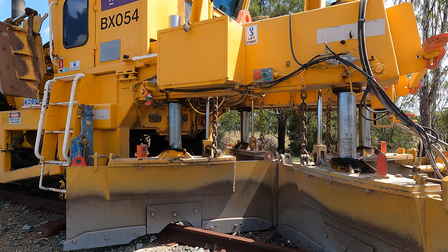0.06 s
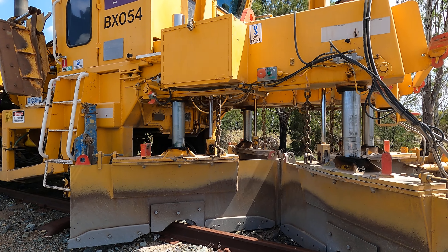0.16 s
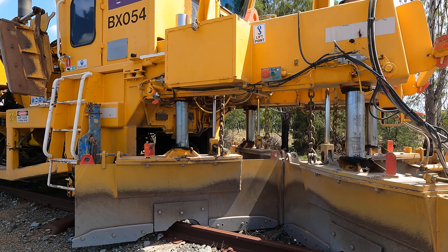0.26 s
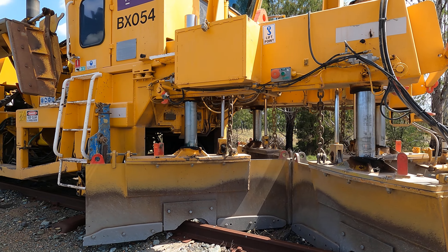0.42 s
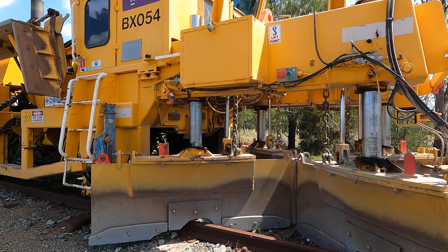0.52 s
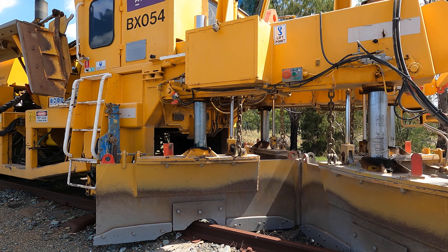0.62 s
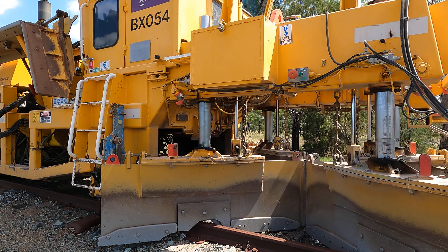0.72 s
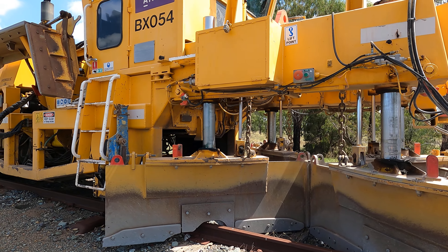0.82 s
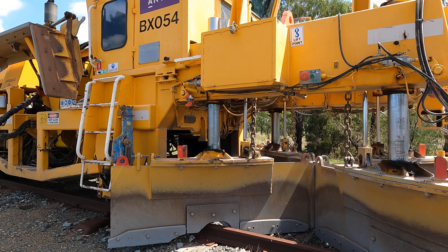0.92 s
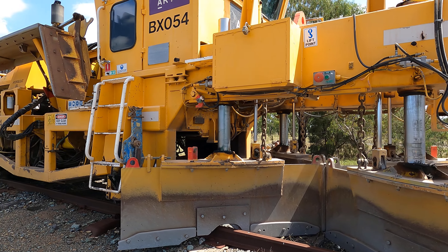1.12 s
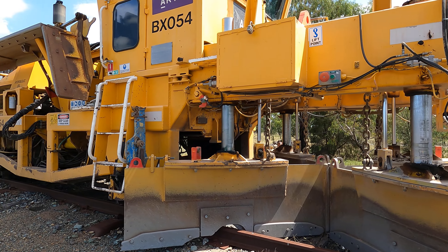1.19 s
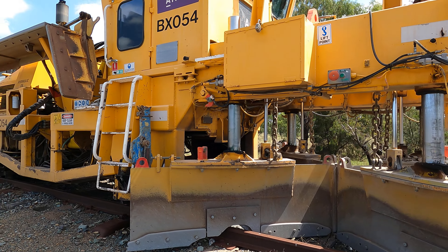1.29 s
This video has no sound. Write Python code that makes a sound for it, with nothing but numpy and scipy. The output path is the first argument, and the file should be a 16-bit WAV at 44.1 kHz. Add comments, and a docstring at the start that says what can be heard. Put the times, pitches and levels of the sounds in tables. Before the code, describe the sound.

A single footstep crunches on gravel, stones snapping together as dull knocks jolt the hand-held microphone. Softer shoe scuffs follow. Light wind nudges the microphone over faint outdoor air, distant insect hiss and thin chirps.

```python
"""Faint outdoor air, thin chirps and insect hiss from the trees, then one step on track gravel, heard from
a hand-held camera. Stones crunch and snap, the ground thuds, and the footfall jolts the camera body with
three quick dull knocks. Softer scuffs of the shoes follow. Air nudges the microphone throughout, and
something in the camera, probably the lens, ticks faintly."""
import sys
import numpy as np
from scipy import signal
from scipy.fft import rfft, irfft, next_fast_len
from scipy.io import wavfile
from scipy.ndimage import map_coordinates

SR = 44100
rng = np.random.default_rng(int(sys.argv[2]) if len(sys.argv) > 2 else 0)


def store_pcm(level_fs):
    """Save levels as 16-bit WAV."""
    pcm = np.round(np.clip(level_fs, -1, 1) * 32767).astype(np.int16)
    wavfile.write(sys.argv[1], SR, np.atleast_2d(pcm).T)


N = 59535
TIME_S = np.arange(N) / SR


def amp(db):
    """Decibels to gain."""
    return 10 ** (np.asarray(db) / 20)


def unit_rms(x):
    """Scale to rms 1."""
    return x / np.sqrt(np.mean(x ** 2) + 1e-20)


def curve_at(points, hz):
    """Interpolate (frequency, value) points on a log axis."""
    knots_hz, values = np.transpose(points)
    return np.interp(np.log(hz + 1), np.log(knots_hz + 1), values)


def tilted(points, db_per_oct, pivot_hz=1500):
    """Tilt a spectrum about the pivot."""
    return [(hz, db + db_per_oct * np.log2(hz / pivot_hz)) for hz, db in points]


def filtered(x, response):
    """Apply response(hz) by FFT."""
    size = next_fast_len(N + SR // 2)
    return irfft(rfft(x, size) * response(np.fft.rfftfreq(size, 1 / SR)), size)[..., :N]


def coloured(x, points):
    """Shape the spectrum; white noise keeps its power."""
    return filtered(x, lambda hz: unit_rms(amp(curve_at(points, hz))))


def pan(db):
    """Constant-power stereo gains; db is left minus right."""
    half_db = np.atleast_1d(db) / 2
    gains = amp([half_db, -half_db])
    return gains / np.sqrt(np.mean(gains ** 2, axis=0))


def stereo_noise(corr):
    """White noise with left-right correlation corr."""
    noise = rng.standard_normal((3, N))
    return np.sqrt(corr) * noise[0] + np.sqrt(1 - corr) * noise[1:]


def coloured_noise(points, corr):
    """Shaped stereo noise, rms 1."""
    return unit_rms(coloured(stereo_noise(corr), points))


def wobble(knots_per_s):
    """Smooth random curve."""
    knots = rng.standard_normal(int(N * knots_per_s / SR) + 4)
    return map_coordinates(knots, [TIME_S * knots_per_s])


def fader(points):
    """Gain along (time, level) points."""
    return amp(np.interp(TIME_S, *np.transpose(points)))


def decay(start_s, t60_s):
    """Step onset, exponential decay."""
    age_s = TIME_S - start_s
    return (age_s >= 0) * amp(-60 * np.maximum(age_s, 0) / t60_s)


def swell(peak_s, db, rise_s, fall_s, pan_db):
    """Stereo envelope, exponential on both sides of the peak."""
    t = TIME_S - peak_s
    return amp(db) * pan(pan_db) * np.exp(-np.maximum(-t / rise_s, t / fall_s))


def burst(start_s, t60_s, corr):
    """Decaying stereo noise with the energy of its envelope."""
    envelope = decay(start_s, t60_s)
    noise = envelope * stereo_noise(corr)
    energy = np.sum(noise ** 2, axis=1, keepdims=True)
    return noise * np.sqrt(np.sum(envelope ** 2) / (energy + 1e-20))


# Background spectrum: (frequency [Hz], gain [dB])
AIR_SPECTRUM = [(20, -4), (45, -12), (85, -39), (130, -9.5), (190, -2), (300, -11), (500, -14.5),
                (800, -22), (1150, -14), (2000, -23.5), (3500, -29.5), (5000, -32), (7200, -34),
                (9800, -44.5), (12500, -31), (15500, -56)]
# Background balance: (frequency [Hz], pan [dB])
AIR_PAN = [(100, -2), (400, -10), (1200, -1.5), (8000, 2), (13000, 11.5)]

def outdoor_air(level_db=-69, waver_db=0.65):
    """Broad outdoor noise; the level wavers slightly."""
    noise = coloured_noise(AIR_SPECTRUM, corr=0.62)
    bed = filtered(noise, lambda hz: pan(curve_at(AIR_PAN, hz)))
    return bed * amp(level_db + waver_db * wobble(knots_per_s=8.4))


# Chorus envelope: (time [s], level [dB])
INSECT_LEVELS = [(0, -72.5), (.2, -70.5), (.45, -73), (.85, -76), (1.05, -77.5), (1.35, -75.5)]
# Chorus spectrum: (frequency [Hz], gain [dB])
INSECT_SPECTRUM = [(3000, -27), (4800, -10.5), (6200, -3.5), (7300, -1), (8300, -11.5), (9500, -19),
                   (12000, -26)]

def insects():
    """Many far insects merge into a narrow, high hiss."""
    return fader(INSECT_LEVELS) * coloured_noise(INSECT_SPECTRUM, corr=0.58)


# Far chirps: (time [s], length [s], start pitch [Hz], end pitch [Hz], level [dB])
CHIRPS = [(.01, .035, 6040, 6850, -71.5), (.315, .02, 7160, 7270, -73.5), (0.343, 0.061, 5950, 5660, -73.5),
          (.372, 0.031, 7500, 7800, -68), (0.422, 0.056, 8030, 7450, -72), (0.733, 0.03, 5850, 5640, -66),
          (.778, 0.027, 8000, 7800, -71.5), (0.821, .018, 5790, 5290, -65), (0.83, 0.022, 7970, 7900, -70),
          (0.842, 0.012, 5830, 5500, -63.5), (0.854, 0.019, 5400, 5440, -63),
          (0.871, 0.022, 5840, 5350, -65.5), (0.833, 0.022, 4820, 5000, -69),
          (0.916, 0.019, 5600, 5970, -63.5), (.955, 0.073, 7150, 6810, -79),
          (1.015, 0.041, 7280, 7700, -69), (1.103, 0.029, 7310, 7340, -69),
          (1.165, 0.03, 7100, 7130, -67.5), (1.271, 0.038, 6900, 7200, -70),
          (1.313, .024, 4570, 4580, -72.5)]

def chirps(rasp_hz=190, echo_gain=0.45):
    """Thin, raspy gliding whistles, smeared by the trees."""
    direct = np.zeros(N)
    for start_s, length_s, start_hz, end_hz, db in CHIRPS:
        progress = np.clip((TIME_S - start_s) / length_s, 0, 1)
        hz = start_hz + (end_hz - start_hz) * progress + rasp_hz * wobble(knots_per_s=1100)
        direct += amp(db) * np.sin(np.pi * progress) * np.sin(2 * np.pi * np.cumsum(hz) / SR)
    trees_ir = decay(0, t60_s=0.12) * stereo_noise(corr=0.7)
    trees_ir /= np.linalg.norm(trees_ir[0])
    return direct + echo_gain * signal.fftconvolve(direct[None], trees_ir, axes=1)[:, :N]


# Buffet envelope: (time [s], level [dB])
BUFFET_LEVELS = [(0, -71.5), (.1, -67), (.18, -51.5), (.3, -40.5), (0.359, -62), (.49, -51.5), (.59, -53),
                 (.68, -60.5), (.76, -55.5), (.92, -54.5), (1.06, -64), (1.18, -57), (1.239, -48.5),
                 (1.35, -48.5)]
# Buffet spectrum: (frequency [Hz], gain [dB])
BUFFET_SPECTRUM = [(12, 1.5), (25, 7), (45, 0.5), (70, -26), (110, -32), (300, -85)]

def mic_buffet():
    """Air pushes on the microphone: deep rumble, mostly right."""
    return fader(BUFFET_LEVELS) * coloured_noise(BUFFET_SPECTRUM, corr=0.75) * pan(db=-8.5)


# Double ticks: (time [s], level [dB])
TICKS = [(.1030, -58), (.2198, -54), (.3262, -63), (.4222, -57), (.5387, -58), (.6462, -60.5), (.7505, -59),
         (.8790, -59), (1.0010, -61), (1.1108, -58.5), (1.2312, -59.5), (1.3435, -59)]
# Tick spectrum: (frequency [Hz], gain [dB])
TICK_SPECTRUM = [(5000, -48), (11000, -12.5), (12100, 5.5), (13500, -3), (15800, -10)]

def lens_ticks(gap_s=0.0066, t60_s=0.005):
    """Tiny, very high ticks in pairs, close to the left microphone port."""
    ticks = np.zeros((2, N))
    for start_s, db in TICKS:
        ticks += amp(db) * (burst(start_s, t60_s, corr=0.68) + burst(start_s + gap_s, t60_s, corr=0.74))
    return pan(db=14) * coloured(ticks, TICK_SPECTRUM)


# Ground loading: (peak time [s], level [dB], rise [s], fall [s], pan [dB])
THUDS = [(0.26, -48.5, 0.04, 0.021, -4.5), (0.589, -67.5, 0.02, 0.054, -5), (0.75, -60, 0.022, 0.037, -2.5),
         (0.871, -65.5, 0.026, 0.0097, -5), (0.984, -68.5, 0.028, 0.09, 1), (1.207, -66.5, 0.01, 0.082, -8),
         (1.28, -58, 0.0086, 0.03, -3)]
# Thud spectrum: (frequency [Hz], gain [dB])
THUD_SPECTRUM = [(40, -8), (100, -9.5), (170, 6.5), (300, 1), (600, -13.5), (900, -20.5), (2500, -64)]

def ground_thuds():
    """The ground thuds softly under the walker's weight."""
    power = sum(swell(*thud) ** 2 for thud in THUDS)
    return np.sqrt(power) * coloured_noise(THUD_SPECTRUM, corr=0.72)


# Shoe scuffs: (peak time [s], level [dB], rise [s], fall [s], pan [dB], tilt [dB/oct])
SCUFFS = [(0.224, -57.5, 0.036, 0.036, 2, -0.5), (0.6, -60, 0.095, 0.09, 6.5, -0.5),
          (.735, -68, 0.06, 0.063, 1, 1), (.895, -68, 0.076, 0.063, 4, 1.5),
          (1.145, -68.5, 0.039, 0.06, 20, -6), (1.216, -67.5, 0.036, .04, 7, -6),
          (1.286, -61.5, 0.021, 0.047, 2.5, -5)]
# Crunch spectrum: (frequency [Hz], gain [dB])
GRAVEL_SPECTRUM = [(150, -13), (400, -6.5), (800, -10), (1250, 3), (2000, -0.5), (3000, -5), (5000, -4.5),
                   (7500, -11.5), (9500, -19.5), (12500, -21), (15500, -37)]

def gravel_scuffs(contacts_per_s=1800, spread_db=3.5, grit_share=0.55, corr=0.37):
    """The shoe grinds on gravel: a crowd of small contacts over fine grit."""
    out = np.zeros((2, N))
    for *shape, db_per_oct in SCUFFS:
        contacts = rng.random(N) < contacts_per_s / SR
        strength = amp(spread_db * np.minimum(rng.exponential(size=N), 3))
        grains = unit_rms(contacts * strength * stereo_noise(corr))
        crunch = np.sqrt(1 - grit_share) * grains + np.sqrt(grit_share) * stereo_noise(corr)
        out += swell(*shape) * unit_rms(coloured(crunch, tilted(GRAVEL_SPECTRUM, db_per_oct)))
    return out


# Stone impacts: (time [s], pre-EQ level [dB], pan [dB], tilt [dB/oct])
SNAPS = [(0.2188, -12, -1, -3), (0.238, -20.5, -3, 2.5), (.2596, -5.5, 2.5, 0), (0.3242, -41, -4, 4.5),
         (.5640, -27.5, 6, -6), (0.581, -20, 8, -8), (.6090, -20.5, 7, -5.5), (.7250, -27.5, 6, -10.5),
         (1.2750, -30, 1, -11), (1.2805, -25.5, 11, -13), (1.2975, -34, 10, 6.5)]
# Stone response: (frequency [Hz], gain [dB])
SNAP_EQ = [(200, -23), (800, -17.5), (1100, -5.5), (1900, -14.5), (2950, -5.5), (4200, -18), (7500, -22),
           (9500, -47), (15000, -56)]

def stone_snaps(crumble_db=0.5, echo_db=-4):
    """Stones click together, crumble briefly and echo off the ground; small ones are brighter."""
    out = np.zeros((2, N))
    for start_s, db, pan_db, db_per_oct in SNAPS:
        click = np.arange(N) == round(start_s * SR)
        crumble = amp(crumble_db) * unit_rms(burst(start_s, t60_s=0.0057, corr=0.61))
        echo = amp(echo_db) * unit_rms(burst(start_s, t60_s=0.016, corr=0.27))
        snap = click + (crumble + echo) / np.sqrt(N)  # energies relative to the click
        eq = tilted(SNAP_EQ, db_per_oct)
        out += amp(db) * pan(pan_db) * filtered(snap, lambda hz: amp(curve_at(eq, hz)))
    return out


# A faint nudge, three knocks: (time [s], pre-EQ level [dB], start pitch [Hz], glide [s], t60 [s])
JOLTS = [(0.1455, -45.5, 273, 0.01, 0.1), (0.219, -19.5, 528, 0.004, 0.052),
         (.2377, -12, 492, 0.0025, 0.08), (.2596, -24, 666, 0.0047, 0.028)]
# Camera body response: (frequency [Hz], gain [dB])
JOLT_EQ = [(20, 1), (60, 3), (150, 1), (300, -4.5), (620, 1.5), (800, -11), (1100, -50), (2000, -49)]
# Microphone port balance: (frequency [Hz], pan [dB])
JOLT_PAN = [(40, -16), (130, -20.5), (260, -13.5), (550, -18.5), (900, -10)]

def camera_jolts(rest_hz=43, attack_s=0.00017, left_lead_s=0.00073):
    """The footfall jolts the camera body: dull knocks of fast-falling pitch, mostly at the right port."""
    knocks = np.zeros(N)
    for start_s, db, start_hz, glide_s, t60_s in JOLTS:
        age_s = np.maximum(TIME_S - start_s, 0)
        cycles = rest_hz * age_s + (start_hz - rest_hz) * glide_s * (1 - np.exp(-age_s / glide_s))
        envelope = decay(start_s, t60_s) * (1 - np.exp(-age_s / attack_s))
        knocks += amp(db) * envelope * np.sin(2 * np.pi * cycles)

    def body_response(hz):
        lead = np.exp(2j * np.pi * hz * np.array([[left_lead_s], [0]]))
        return amp(curve_at(JOLT_EQ, hz)) * pan(curve_at(JOLT_PAN, hz)) * lead

    return filtered(knocks, body_response)


def scene():
    """Stereo sum, background to footstep."""
    background = outdoor_air() + insects() + chirps() + mic_buffet() + lens_ticks()
    return background + ground_thuds() + gravel_scuffs() + stone_snaps() + camera_jolts()


def record(dry):
    """Camera band limit: brick-wall low-pass."""
    cutoff_hz = 15900
    return filtered(dry, lambda hz: hz < cutoff_hz)


dry = scene()
out = record(dry)
store_pcm(out)
```